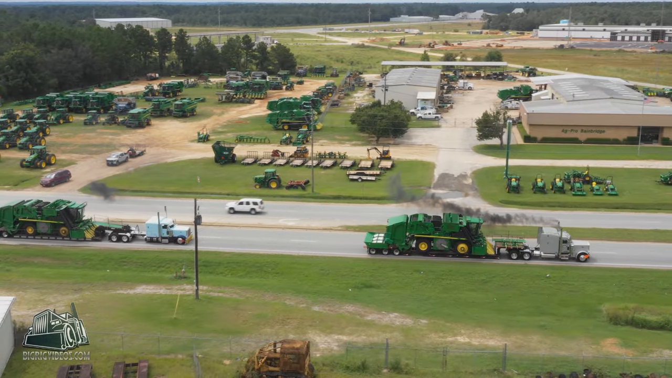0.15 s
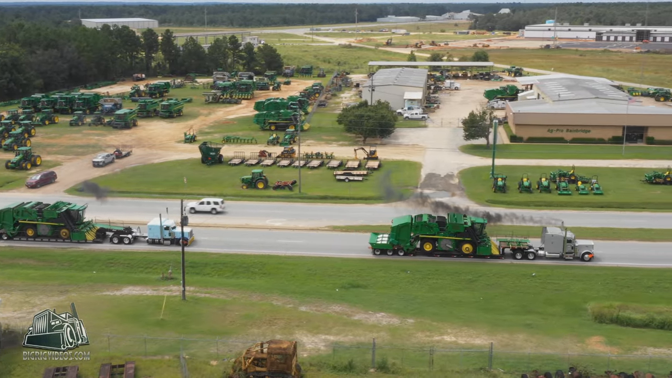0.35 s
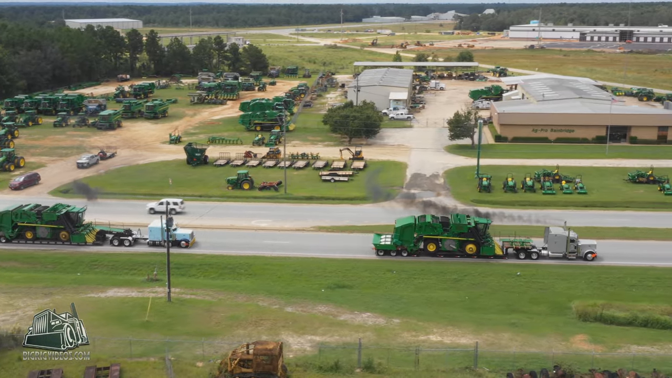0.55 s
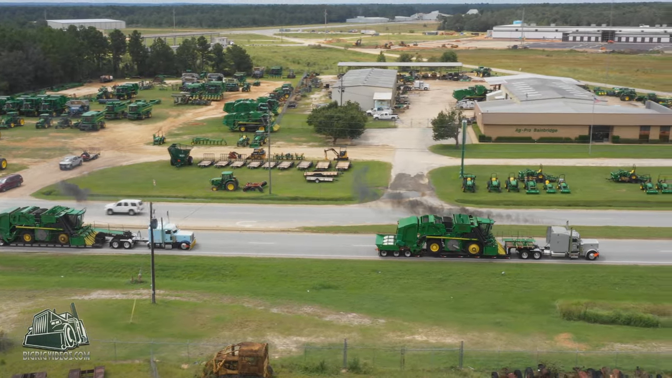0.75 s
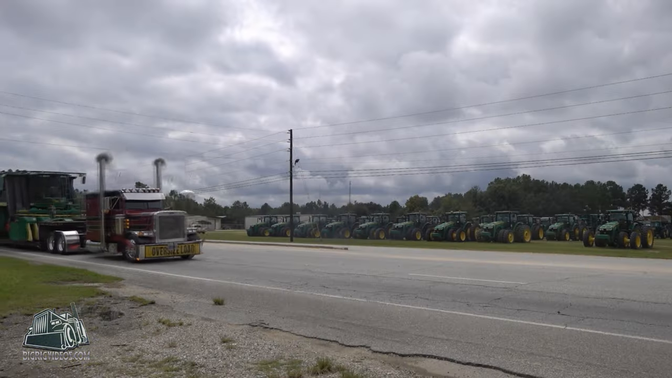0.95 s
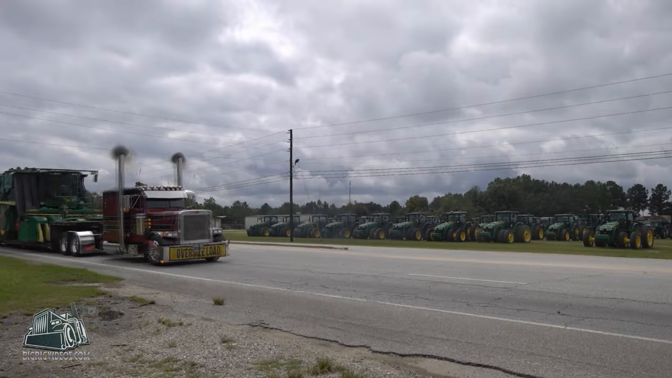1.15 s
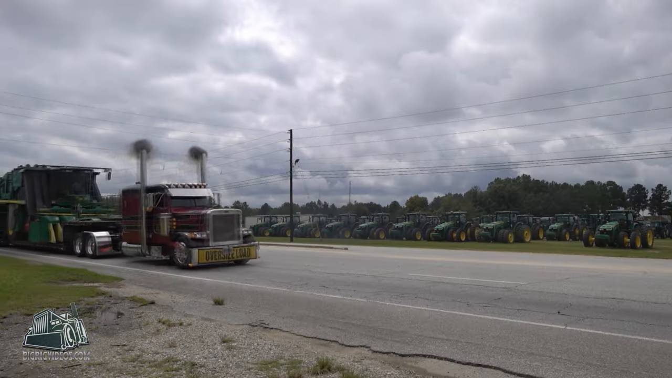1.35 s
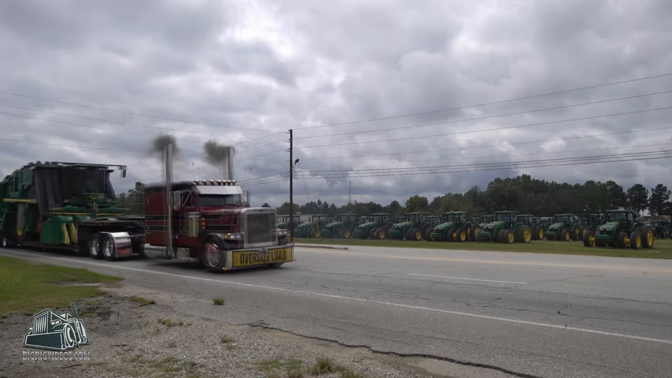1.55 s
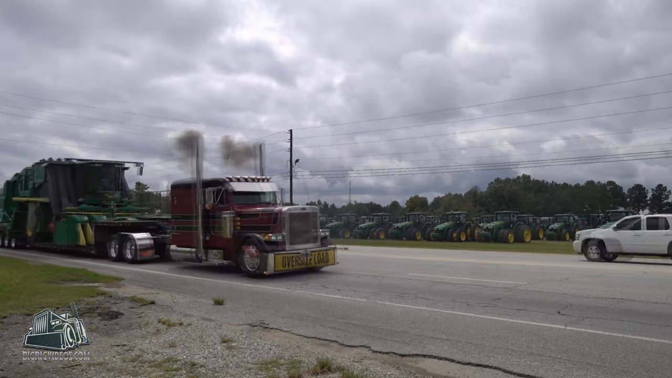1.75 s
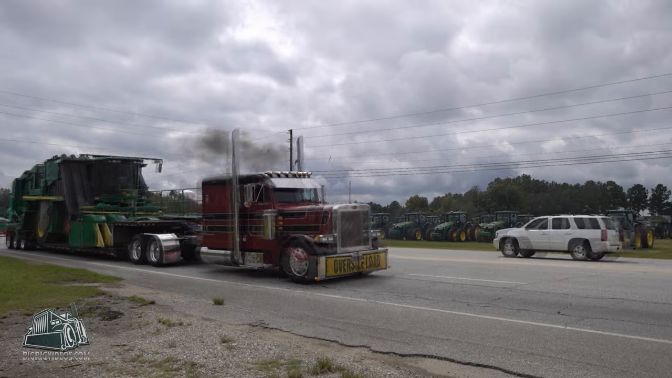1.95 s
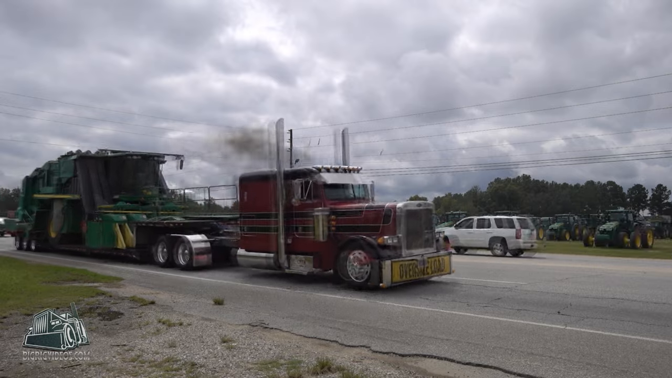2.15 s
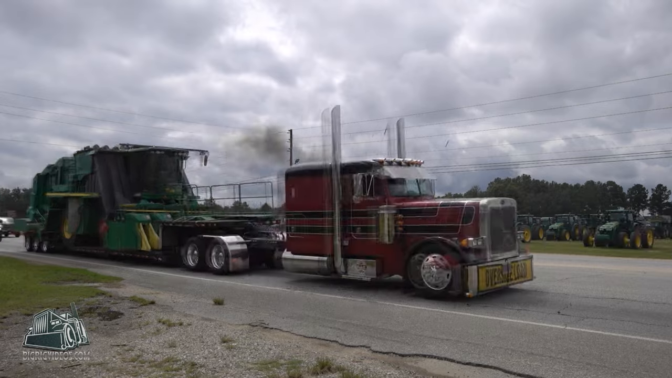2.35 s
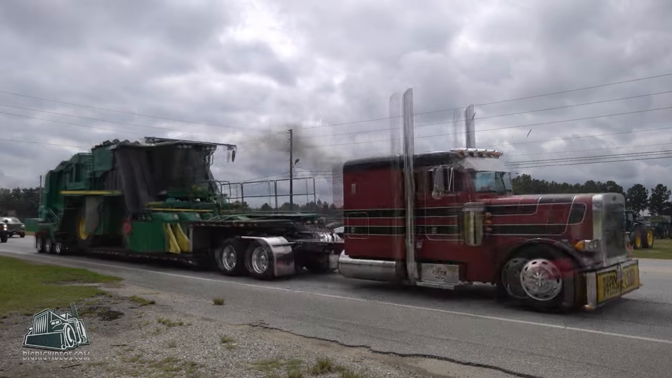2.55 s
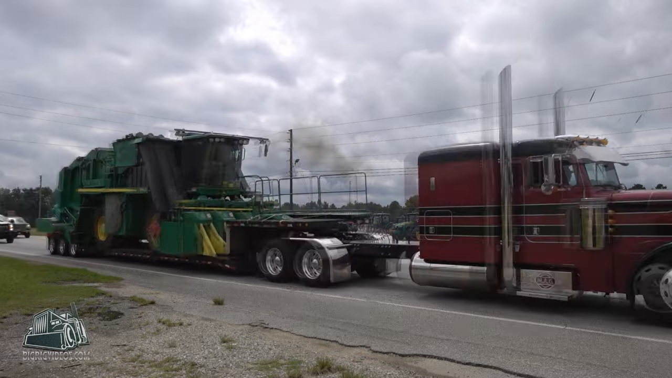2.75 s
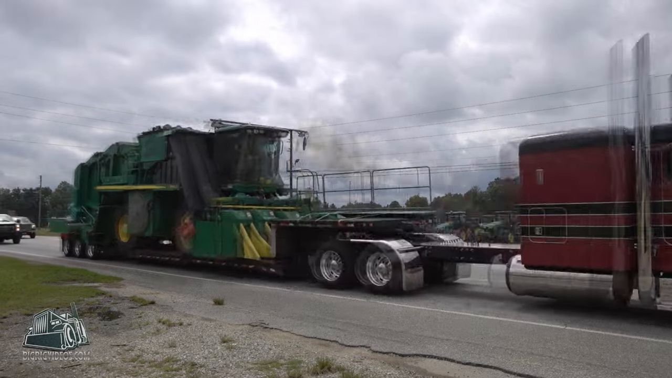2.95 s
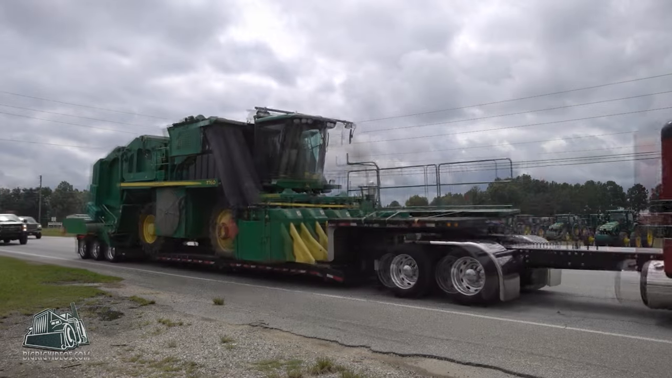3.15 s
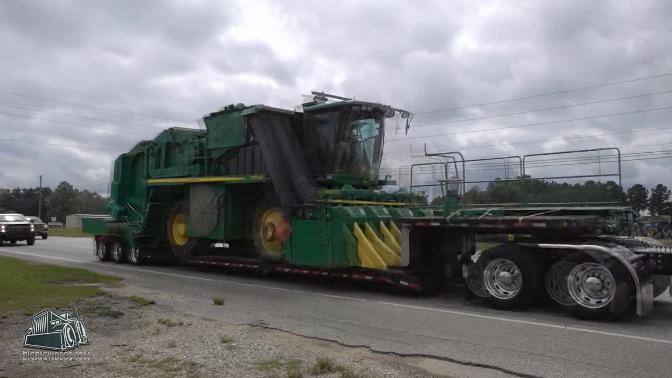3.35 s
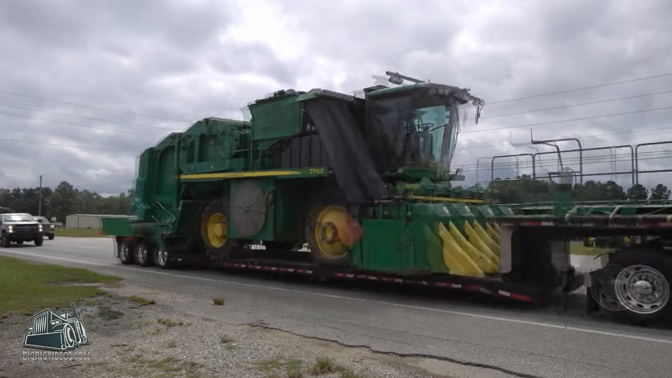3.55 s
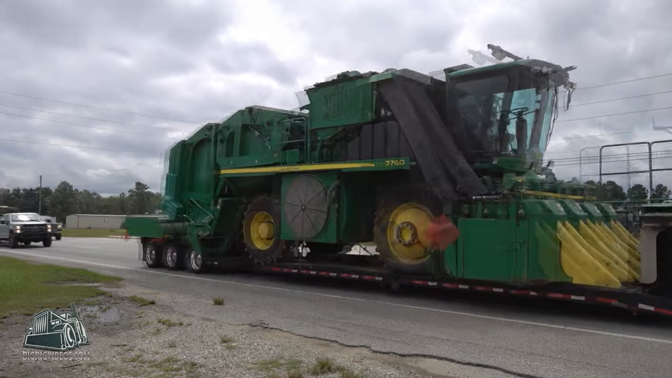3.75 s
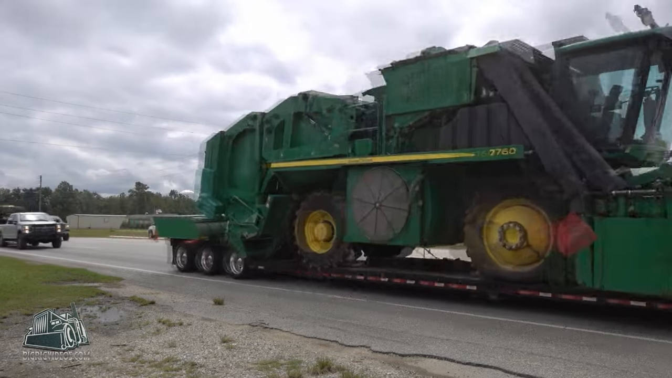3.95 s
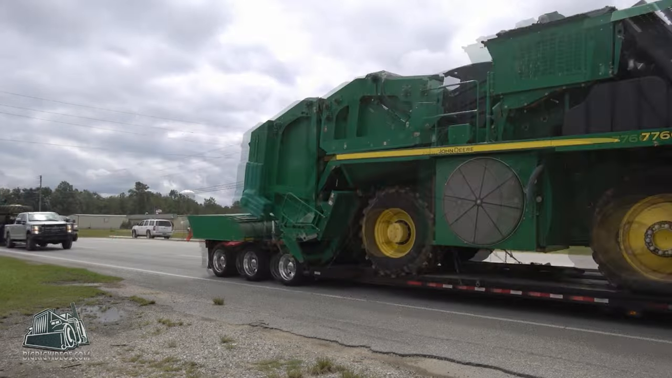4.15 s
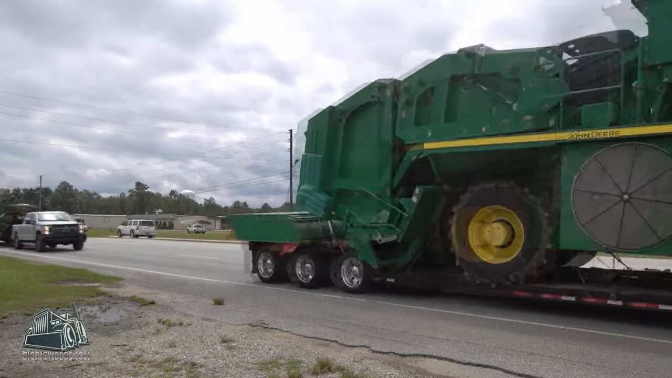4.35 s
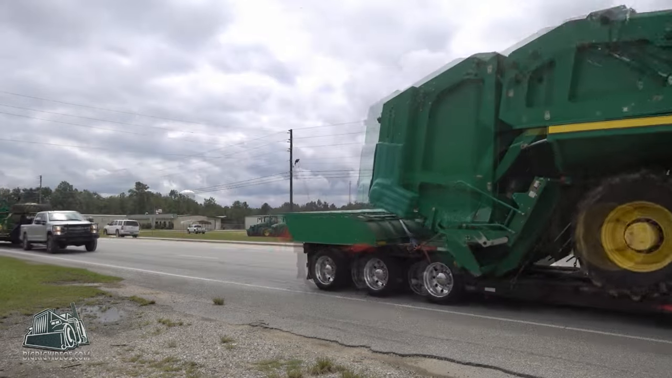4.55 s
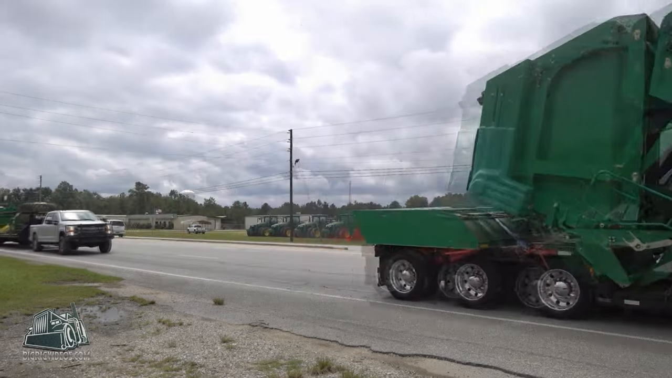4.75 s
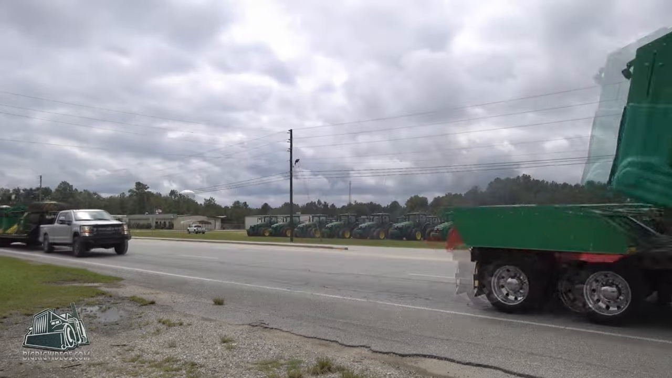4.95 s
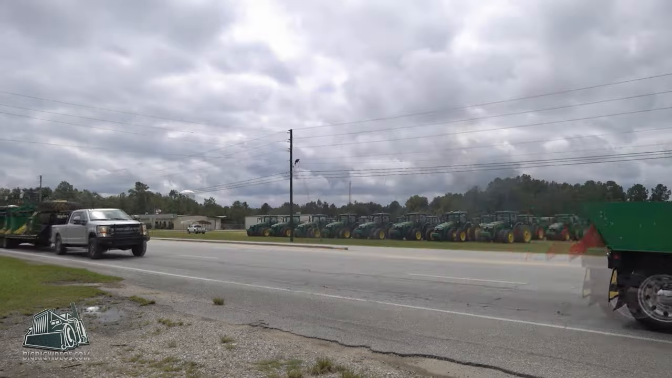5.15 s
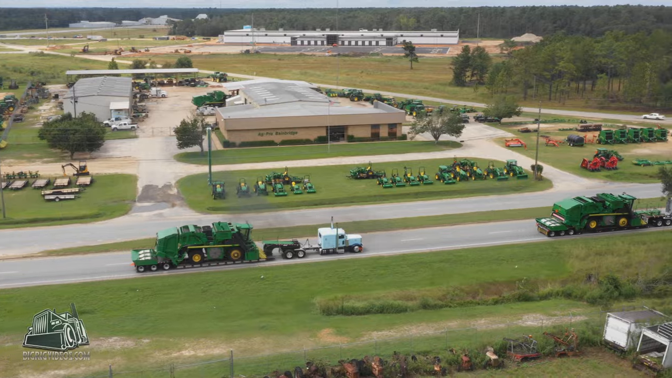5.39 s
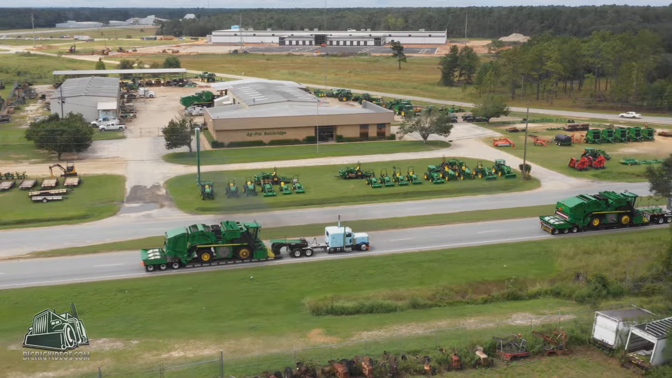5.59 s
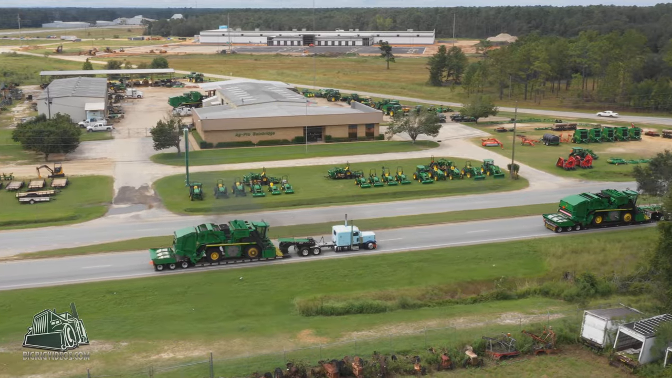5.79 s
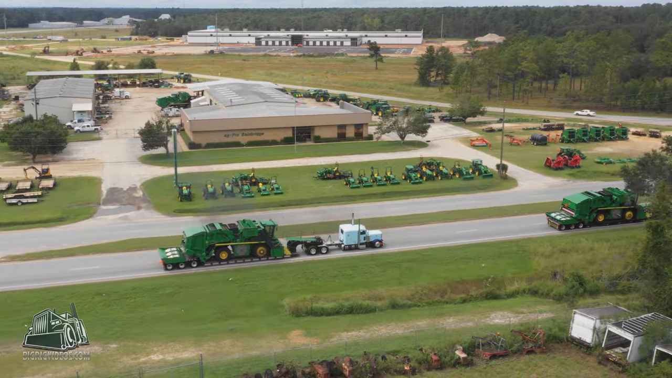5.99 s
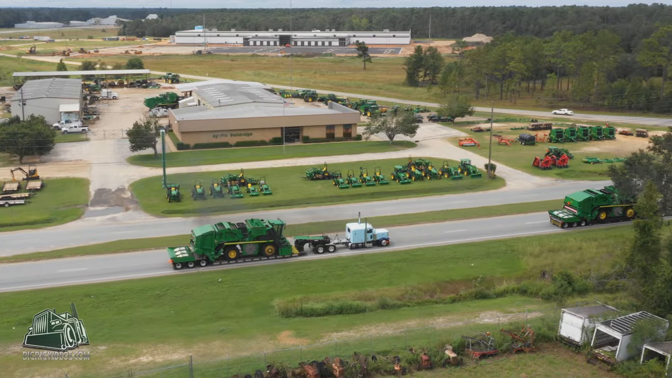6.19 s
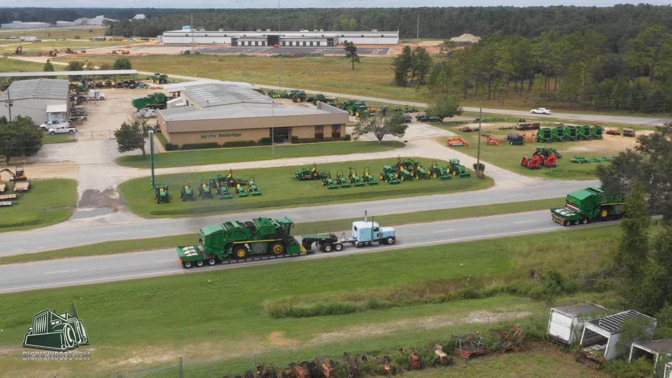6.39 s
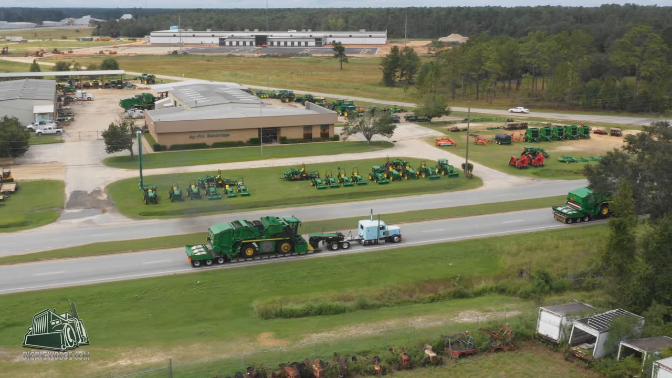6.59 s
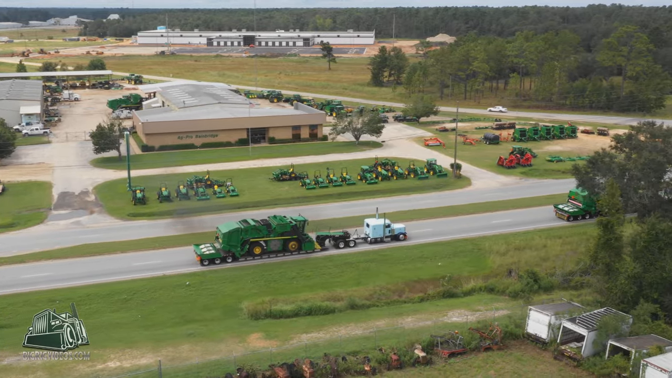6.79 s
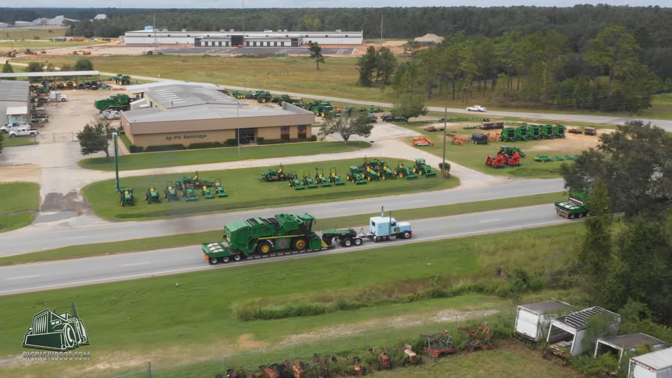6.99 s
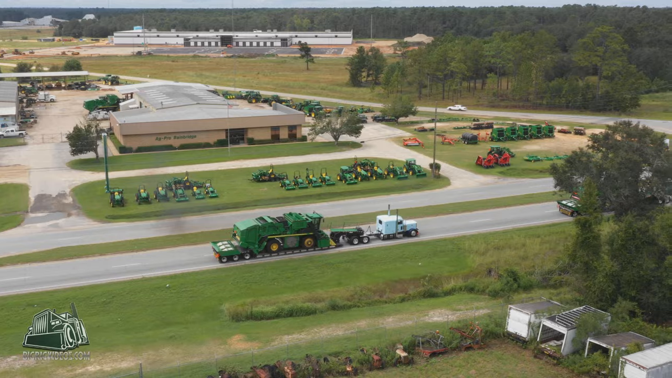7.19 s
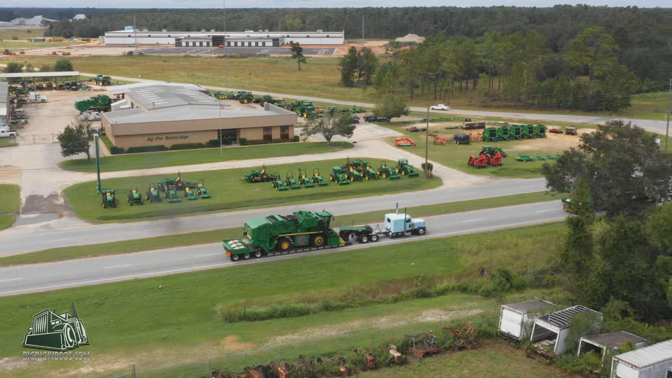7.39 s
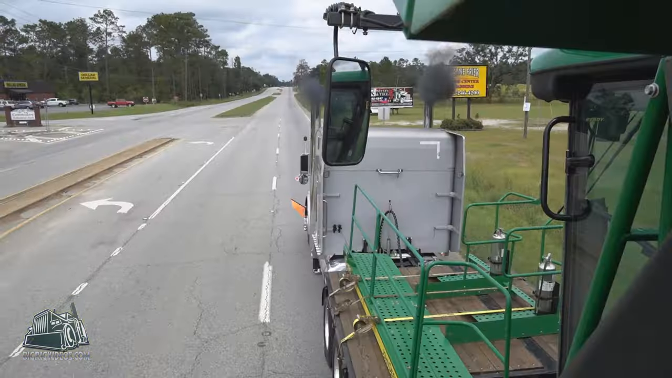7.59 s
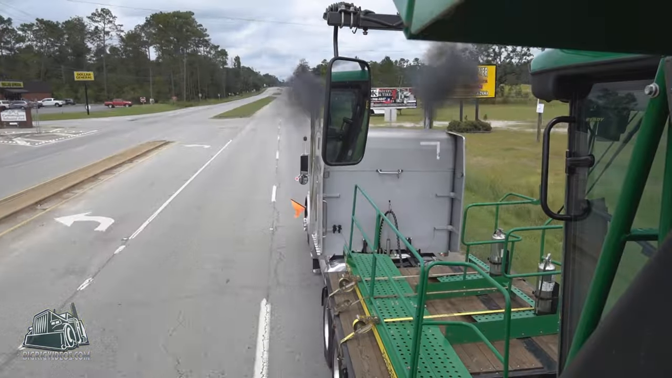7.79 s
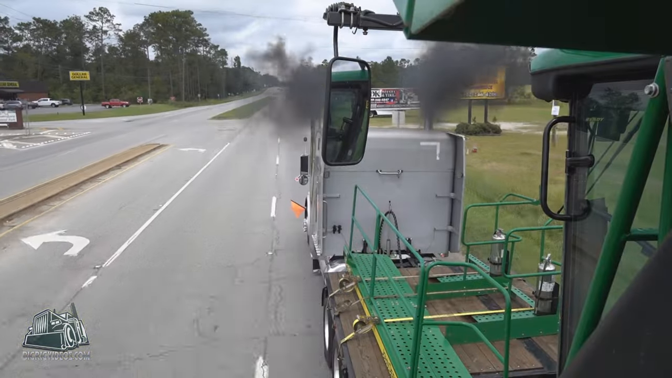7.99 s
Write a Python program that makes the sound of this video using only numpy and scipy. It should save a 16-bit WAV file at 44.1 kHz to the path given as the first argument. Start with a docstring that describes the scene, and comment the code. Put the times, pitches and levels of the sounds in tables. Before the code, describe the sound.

Heavy diesel trucks pull hard past a roadside microphone. The first draws away with a low drone and a thin falling whistle. A second swells up and booms by at close range, its exhaust growling, its engine clattering and its turbo whistling high. As it recedes, a third truck's tyre roar, engine rattle and bright rushing air close in and hold steady, with a brief gust of wind.

```python
"""Diesel convoy at the roadside

Heavy six-cylinder trucks pull hard past the microphone. The lead truck draws away, its exhaust drone
beating against that of the next, which booms past with a whistling turbo. Uneven firings make its stacks
growl, and its echo off the road sweeps through the rasp. Then a third truck's tyres and air rush in."""
import sys
import numpy as np
from scipy import signal
from scipy.fft import rfft, irfft, next_fast_len
from scipy.io import wavfile
from scipy.ndimage import uniform_filter1d

SR = 44100
rng = np.random.default_rng(int(sys.argv[2]) if len(sys.argv) > 2 else 0)


def generate_wav(signal):
    """Clip the signal to [-1, 1] and save it as 16-bit WAV at the path in sys.argv[1]."""
    frames = np.transpose(np.atleast_2d(signal))
    scaled = np.clip(frames, -1, 1) * 32767
    pcm = np.round(scaled).astype(np.int16)
    wavfile.write(sys.argv[1], SR, pcm)


N = 354123
T = np.arange(N) / SR

# The passing truck gathers speed. Each row: time in seconds, firing rate in Hz.
FIRING_RATE = [(0, 65.2), (.3, 64.6), (.6, 65.5), (1.2, 68.2), (2.4, 72.2), (3.1, 73.15), (4.4, 74),
               (5.5, 75.3), (6, 76.9), (8.03, 80.8)]
# Its cylinders in firing order. Each row: relative strength in dB, lag in milliseconds.
CYLINDERS = [(3, -0.047), (-1.5, -0.23), (-3, 0.24), (1, 0.0087), (1, -0.16), (-2.5, .2)]
# Its boom, the second exhaust harmonic. Each row: time in seconds, level in dB.
BOOM = [(0, -35), (.4, -28), (1.4, -24), (2.25, -31), (3, -9.2), (3.4, -8), (3.7, -13), (4.15, -7.4),
        (4.5, -7.2), (5.25, -12.8), (5.8, -20), (6.5, -22.5), (7.2, -34), (8.03, -28)]
# Its other harmonics. Each row: harmonic, crest in seconds, level before the echo in dB, width in
# seconds, rise and fade in dB per doubling of distance, share of road echo.
HARMONIC_SWELLS = [(1, 2.66, -21, 0.64, 3.6, 2.95, 0.79), (3, 4.81, -21, 1.65, 10.2, 17.7, 0.45),
                   (4, 3.4, -30.5, 1.3, 12, 4.8, 0.88), (5, 6.1, -34, 0.56, 14, 12, .5),
                   (7, 2.45, -34, 0.3, 6.1, 14, .3)]
# Two of them flare. Each row: harmonic, time in seconds, lift in dB, half length in seconds.
FLARES = [(3, 2.26, 9.5, 0.25), (4, 3.28, 9.5, 0.21)]
# Its stacks ring at close range. Each row: multiple of the crank rate, relative level in dB.
STACK_NOTES = [(13, -4), (14, -9), (15, -6), (16, 3), (17, -7), (18, -8), (19, -1), (20, -12), (21, -13),
               (22, -7), (23, -15), (25, -13), (26, -17)]
# Air riding on its turbo. Each row: multiple of the pitch, crest in seconds, level in dB, width in seconds.
TURBO_BANDS = [(1.65, 3.45, -61.5, .8), (1.42, 2.4, -68.5, .4), (.76, 4.8, -57, .5), (.52, 1.9, -58, .6)]
# Turbo whistles. Each row: time in seconds, pitch in Hz, level in dB.
PASSING_TURBO = [(1.05, 6100, -71), (1.21, 6420, -62), (1.44, 7040, -64), (1.71, 7260, -61),
                 (2.24, 7260, -54.5), (2.99, 6786, -46), (3.24, 6530, -42), (3.53, 6360, -59),
                 (3.71, 6208, -45), (4.45, 6140, -65), (4.81, 6208, -53), (5.6, 6230, -63)]
LEAD_TURBO = [(0.0, 8050, -64.5), (0.44, 7843, -65), (0.474, 7900, -81), (0.826, 7641, -62),
              (1.4, 7401, -75)]
# Exhaust harmonics, from the first up. Each row: crest in seconds, level in dB, width in seconds.
LEAD_DRONE = [(.4, -20, 0.42), (.3, -22, .95), (.6, -31, 0.78), (.85, -28.5, 0.49), (.9, -31.5, 0.35),
              (1.15, -33.5, 0.28)]
THIRD_DRONE = [(6.8, -39, 1.1), (7.48, -27.5, 0.37), (7.35, -33, 0.55)]
# Grit and chain. Each row: start in seconds, relative level in dB.
TICKS = [(.237, -37), (.419, -45), (3.853, -30), (5.199, -37), (6.799, -26.5)]

# The tone colour of each layer. Each row: frequency in Hz, relative level in dB.
LOPE_EQ = [(15, -26), (45, -12.5), (100, 3.5), (170, 2.5), (260, -5), (330, -2.5), (500, -18)]
GROWL_EQ = [(90, -21), (190, -5.5), (300, -2.5), (350, -7), (400, -3.5), (470, -12.5), (800, -17)]
RASP_EQ = [(270, -18), (330, -3), (400, 3), (520, 4.5), (650, 0), (820, -1.5), (1050, -5), (1400, -23),
           (2500, -38)]
CLATTER_EQ = [(600, -5), (900, -3), (1200, -1), (1450, -5.5), (1750, -3.5), (2020, -4), (2400, -11),
              (2750, -13.5), (3300, -22), (3750, -17.5), (4300, -29.5)]
INTAKE_EQ = [(2400, -3.5), (3000, 0), (3800, -1.5), (4500, -4.5), (7000, -6.5), (10500, -17.5),
             (13000, -22.5), (15500, -25)]
LEAD_CLATTER_EQ = [(900, 1), (1500, -13), (2100, 0), (2500, -1), (2950, -6), (3600, -10.5), (7000, -23)]
BARK_EQ = [(500, 1), (750, -8), (1050, -3), (1300, 0.5), (1550, -10.5)]
TYRE_EQ = [(300, 6), (400, 5), (480, 0), (580, -6), (720, -1), (850, 4.5), (970, -6.5), (1080, -1.5),
           (1300, -9), (1500, -16.5), (2500, -32.5)]
RATTLE_EQ = [(1400, -10), (1600, -8), (1715, -2), (1880, -7.5), (2080, 3), (2200, -4.5), (2320, -3),
             (2550, -8.5), (3100, -9.5), (3800, -22)]
AIR_EQ = [(2500, -26), (3000, -9.5), (3500, -0.5), (4400, -5.5), (4950, 2), (5300, -1), (5750, -20),
          (6250, -15), (6720, -23), (7100, -16), (7700, -25), (8500, -23), (10000, -30), (15000, -33)]
WIND_EQ = [(12, -12), (28, -2), (50, 0), (90, -6), (250, -24)]


def passing_truck():
    """The main truck: exhaust, clatter and intake pulse with the firings under a whistling turbo."""
    hz, = curves(FIRING_RATE)
    cycles = np.cumsum(hz) / SR + .5  # it starts out firing between the lead truck's beats
    puff = np.exp(-(cycles % 1) / .69)  # gas and knock follow each firing
    leaving_db = -12 * np.maximum(T - 5.2, 0)
    clatter = block_clatter(puff, leaving_db)
    whistle = turbo(PASSING_TURBO, flutter_db=4, breath_db=-6, octave_db=-20.5)
    boom = drone(cycles, stack_levels(hz), waver_db=.8)
    return boom + exhaust(cycles) + clatter + intake(puff, leaving_db) + whistle


def drone(cycles, levels_db, waver_db):
    """The low harmonics of the firing rate that the exhaust stacks let through."""
    return sum(np.sqrt(2) * undb(db + waver_db * wobble(17)) * np.sin(2 * np.pi * k * cycles)
               for k, db in enumerate(levels_db, 1))


def stack_levels(hz):
    """The passing drone's harmonics in dB: the boom, and others that the road echo lifts and dips."""
    levels = {k: swell(*row) + road_comb(k * hz, share) for k, *row, share in HARMONIC_SWELLS}
    levels[2], = curves(BOOM)
    for k, at_s, lift_db, half_s in FLARES:
        levels[k] += lift_db * np.exp(-((T - at_s) / half_s) ** 2)
    return [levels.get(k, -np.inf) for k in range(1, max(levels) + 1)]


def exhaust(cycles):
    """Uneven firings make the stacks lope and growl; their notes and rasping gas bounce off the road."""
    lope_db = swell(3.5, db=-23, width_s=.6, rise_db=2, fade_db=3)
    rasp_db = swell(4, db=-27.5, width_s=1.05, rise_db=7, fade_db=12.5)
    notes_db = swell(3.82, db=-25, width_s=.9, rise_db=16, fade_db=33)
    # the growl is strongest once the stacks point back at the microphone
    growl_db = surge(5.5, 5.5, db=-23.5, floor_db=-31.5, up_db_per_s=5, down_db_per_s=3)
    pulses, uneven = firings(cycles, scatter_db=1.2, jitter_ms=.1)
    lope = undb(lope_db) * colour(uneven + .7 * white(), LOPE_EQ)
    growl = undb(growl_db) * colour(uneven + 1.25 * white(), GROWL_EQ)
    gas = colour(.65 * pulses + white(), RASP_EQ)
    rasp = undb(rasp_db) * road_echo(gas, share=.55, dull_hz=2500)
    notes = undb(notes_db) * road_echo(stack_notes(cycles, waver_db=3.2), share=.6, dull_hz=2500)
    return lope + growl + rasp + notes


def firings(cycles, scatter_db, jitter_ms):
    """One pulse per firing, sized and timed by its cylinder; also the uneven part on its own."""
    at = np.flatnonzero(np.diff(np.floor(cycles)))
    chance = rng.standard_normal((len(at), 2))
    db, lag_ms = np.resize(CYLINDERS, (len(at), 2)).T
    strength = undb(db + scatter_db * chance[:, 0])
    late = np.round((lag_ms + jitter_ms * chance[:, 1]) * SR / 1000).astype(int)
    pulses, even = np.zeros((2, N))
    pulses[np.clip(at + late, 0, N - 1)] = strength
    even[at] = strength.mean()
    return unit(pulses), unit(pulses - even)


def stack_notes(cycles, waver_db):
    """No two cylinders fire alike, so the stacks ring on multiples of the crank rate."""
    phases = rng.random(len(STACK_NOTES))
    crank = cycles / 3  # three firings a turn
    return unit(sum(undb(db + waver_db * wobble(9)) * np.sin(2 * np.pi * (k * crank + phase))
                    for (k, db), phase in zip(STACK_NOTES, phases)))


def block_clatter(puff, leaving_db):
    """The engine block knocks with each firing, and the road throws the knock back."""
    db = swell(3, db=-31.5, width_s=1, rise_db=6, fade_db=6.5) + leaving_db
    knock = colour((1 + puff) * undb(1.1 * wobble(60)) * white(), CLATTER_EQ)
    return undb(db) * road_echo(knock, share=.55, dull_hz=1900)


def intake(puff, leaving_db):
    """Air hisses into the engine; broad bands of it ride on the turbo's pitch."""
    turbo_hz, _ = curves(PASSING_TURBO)
    angle = 2 * np.pi * np.cumsum(turbo_hz) / SR
    whoosh = sum(undb(swell(*row, rise_db=12.5, fade_db=12.5)) * unit(wobble(1100 * k) * np.sin(k * angle))
                 for k, *row in TURBO_BANDS)
    hiss_db = swell(3, db=-43, width_s=.93, rise_db=7, fade_db=5.5) + leaving_db
    hiss = colour((1.1 + puff) * white(), INTAKE_EQ)
    dull = signal.sosfilt(signal.butter(2, 5200, fs=SR, output="sos"), hiss)
    near = undb(.66 * (hiss_db - hiss_db.max()))  # the top end only carries from close by
    return undb(hiss_db) * (near * hiss + (1 - near) * dull) + whoosh


def turbo(path, flutter_db, breath_db, octave_db, fade_db_per_s=47):
    """A compressor whistle fluttering in the moving air, with a breathy edge and a faint blurred octave."""
    hz, db = curves(path)
    outside_s = np.abs(T - np.clip(T, path[0][0], path[-1][0]))  # it dies away at both ends
    angle = 2 * np.pi * np.cumsum(hz + 14 * wobble(130)) / SR
    tone = undb(flutter_db * wobble(70)) * np.sin(angle)
    breath = undb(breath_db) * (wobble(460) * np.sin(angle) + wobble(500) * np.cos(angle))
    octave = undb(octave_db) * wobble(700) * np.sin(2 * angle)
    return np.sqrt(2) * undb(db - fade_db_per_s * outside_s) * (tone + breath + octave)


def road_lag(longest_ms=2.285):
    """Seconds by which the road echo trails the passing truck, longest when the stacks are nearest."""
    return longest_ms / 1000 / distance(nearest_s=3.445, width_s=.88)


def road_echo(x, share, dull_hz):
    """Add the duller bounce off the road; its moving lag sweeps a comb through the sound."""
    soft = signal.filtfilt(*signal.butter(1, dull_hz, fs=SR), x)
    return unit(x + share * np.interp(T - road_lag(), T, soft))


def road_comb(hz, share):
    """The dB by which the road echo lifts or dips a tone."""
    return 20 * np.log10(np.abs(1 + share * np.exp(2j * np.pi * hz * road_lag())))


def lead_truck(firing_hz=69, climb_hz_per_s=2.35):
    """The truck drawing away: drone, block clatter, a last exhaust bark and a falling whistle."""
    cycles = np.cumsum(firing_hz + climb_hz_per_s * T) / SR
    slopes = dict(rise_db=12, fade_db=10)
    levels_db = [swell(*row, **slopes) for row in LEAD_DRONE]
    puff = .3 + np.exp(-(cycles % 1) / .3)
    clatter = undb(swell(0, db=-44, width_s=.2, **slopes)) * colour(puff * white(), LEAD_CLATTER_EQ)
    bark = undb(swell(1.28, db=-34.5, width_s=.22, **slopes)) * colour(puff * white(), BARK_EQ)
    fade_out = np.interp(T, [2.2, 2.8], [1, 0])
    engine = fade_out * (drone(cycles, levels_db, waver_db=2.5) + clatter + bark)
    return engine + turbo(LEAD_TURBO, flutter_db=2.5, breath_db=-10.5, octave_db=-36)


def third_truck(alongside_s=6.15, firing_hz=79.7, climb_hz_per_s=1.8):
    """Tyre roar, engine rattle and bright rushing air close in and hold, over a swelling drone."""
    cycles = np.cumsum(firing_hz + climb_hz_per_s * (T - alongside_s)) / SR
    tyre_db = build(5.78, db=-27.6, db_per_s=32) + .43 * wobble(18) + 1.9 * wobble(90)
    tyres = undb(tyre_db) * colour(stereo_noise(side_db=-4.5), TYRE_EQ)
    shake_db = 1.3 * wobble(35) + 2.1 * wobble(160)
    knock = (1 + np.exp(-(cycles % 1) / .32)) * undb(shake_db) * stereo_noise(side_db=-9)
    load_db = np.interp(T, [7.68, 7.79], [0, 3.5])  # the rattle hardens as the load comes on
    pan_db = np.array([[1.4], [-1.4]])
    rattle = undb(build(alongside_s, db=-35, db_per_s=12) + load_db + pan_db) * colour(knock, RATTLE_EQ)
    air_db = build(6.29, db=-35, db_per_s=16) + .6 * shake_db + 1.6 * wobble(80)
    air = undb(air_db) * colour(stereo_noise(side_db=-14.5), AIR_EQ)
    levels_db = [swell(*row, rise_db=16, fade_db=16) for row in THIRD_DRONE]
    fade_in = undb(build(5.5, db=0, db_per_s=35))
    left, right = fade_in * (tyres + rattle + air + drone(cycles, levels_db, waver_db=5.5))
    return np.array([np.roll(left, 1), right])  # it reaches the right side first


def ticks(decay_s):
    """Sharp ticks of grit and chain from the rolling rigs."""
    bursts = white() * sum(undb(db) * np.exp(-np.abs(T - s) / decay_s) * (T >= s) for s, db in TICKS)
    return .52 * bursts.std() * colour(bursts, [(2500, 14), (5000, 2), (7500, -1), (12000, -19.5)])


def roadside(hum_hz=45.1, hum_db=-34.5):
    """The bed: a low hum and a breeze, with one gust buffeting the microphone."""
    hum = np.sqrt(2) * undb(hum_db + .73 * wobble(5)) * np.sin(2 * np.pi * hum_hz * T)
    wind_db = surge(6.25, 6.9, db=-31, floor_db=-44, up_db_per_s=18, down_db_per_s=25)
    wind = undb(wind_db + 2.5 * wobble(16)) * colour(stereo_noise(side_db=-17), WIND_EQ)
    return hum + wind


def distance(nearest_s, width_s):
    """Distance of a passer-by as a multiple of its closest; width is that closest distance over speed."""
    return np.hypot(1, (T - nearest_s) / width_s)


def swell(crest_s, db, width_s, rise_db, fade_db):
    """A pass-by envelope in dB; rise and fade are per doubling of distance."""
    return db - np.where(T < crest_s, rise_db, fade_db) * np.log2(distance(crest_s, width_s))


def build(full_s, db, db_per_s):
    """An envelope in dB that climbs steadily, then holds."""
    return db - db_per_s * np.maximum(full_s - T, 0)


def surge(from_s, until_s, db, floor_db, up_db_per_s, down_db_per_s):
    """An envelope in dB that climbs from a floor, holds and sinks back."""
    return np.maximum(floor_db, build(from_s, db, up_db_per_s) - down_db_per_s * np.maximum(T - until_s, 0))


def curves(table):
    """A per-sample curve for each column after the time."""
    times, *columns = np.transpose(table)
    return [np.interp(T, times, column) for column in columns]


def colour(x, eq):
    """Shape a sound with an EQ curve, falling 36 dB an octave beyond its ends; rms 1."""
    hz, db = np.transpose(eq)
    size = next_fast_len(N)
    bins_hz = np.maximum(np.arange(size // 2 + 1) * SR / size, 1)
    octaves_out = np.maximum(np.log2(hz[0] / bins_hz), 0) + np.maximum(np.log2(bins_hz / hz[-1]), 0)
    gain = undb(np.interp(np.log(bins_hz), np.log(hz), db) - 36 * octaves_out)
    return unit(irfft(rfft(x, size) * gain, size)[..., :N])


def wobble(rate_hz):
    """Smooth random modulation with a spread near 1."""
    hold = int(SR / rate_hz)
    steps = np.repeat(rng.standard_normal(N // hold + 1), hold)
    return 1.18 * uniform_filter1d(uniform_filter1d(steps, hold), hold)[:N]


def stereo_noise(side_db):
    """Mid-side white noise; the side level sets the width."""
    mid, side = rng.standard_normal((2, N))
    return mid + undb(side_db) * side * np.array([[1], [-1]])


def white():
    """White noise, rms 1."""
    return rng.standard_normal(N)


def unit(x):
    """Scale to rms 1."""
    return x / np.sqrt(np.mean(x ** 2))


def undb(db):
    """Decibels to gain."""
    return 10 ** (np.asarray(db) / 20)


def scene():
    """The convoy over the roadside bed, in stereo."""
    return lead_truck() + passing_truck() + third_truck() + ticks(decay_s=.0079) + roadside()


def record(dry):
    """Clip at full scale and cut the top above 15.7 kHz."""
    return signal.sosfilt(signal.ellip(10, .1, 80, 15700, fs=SR, output="sos"), np.clip(dry, -1, 1))


dry = scene()
out = record(dry)
generate_wav(out)
```